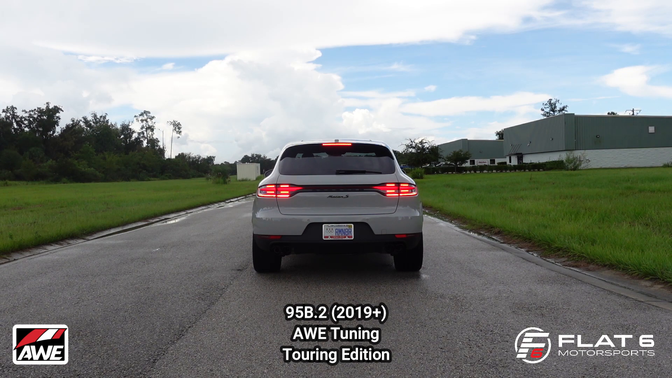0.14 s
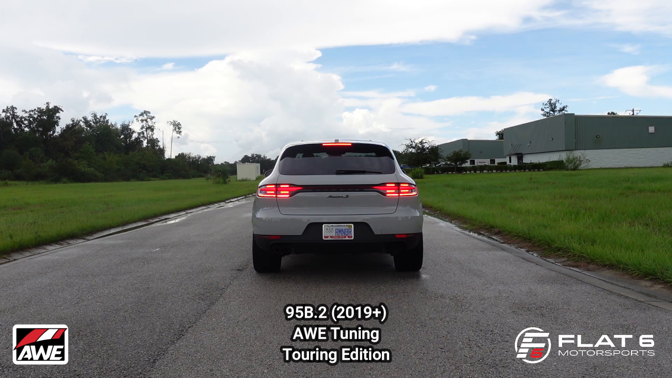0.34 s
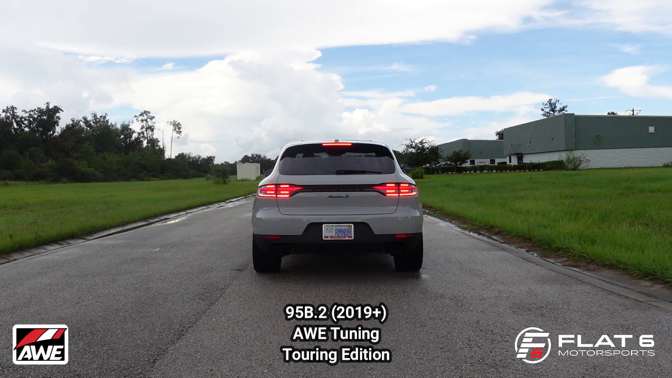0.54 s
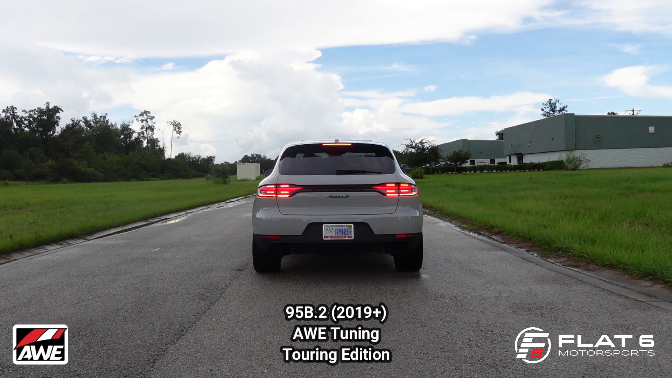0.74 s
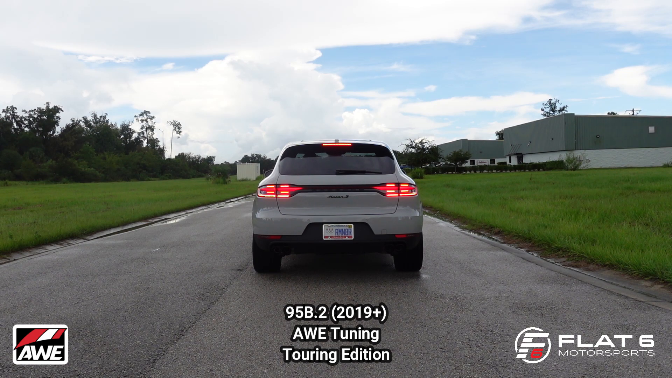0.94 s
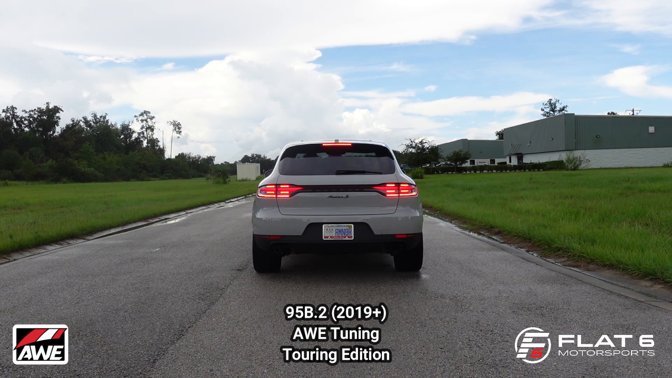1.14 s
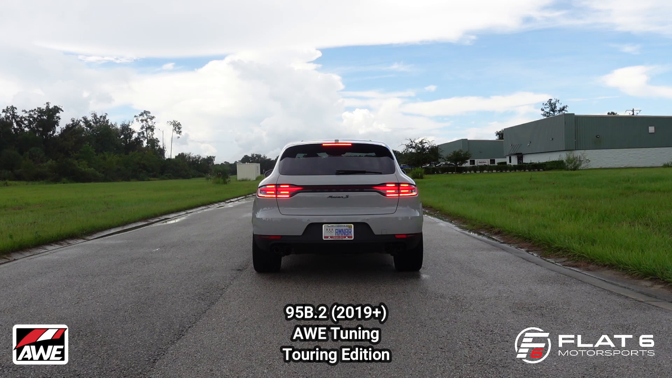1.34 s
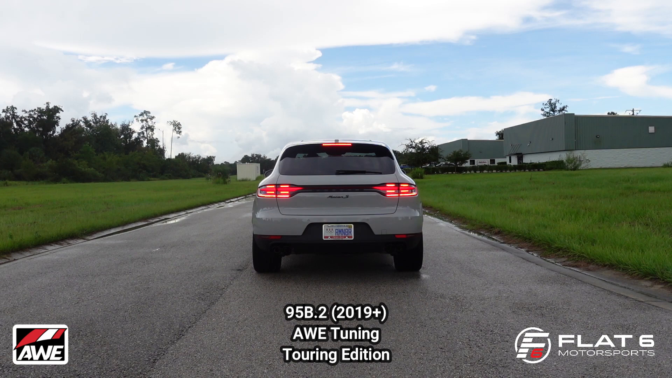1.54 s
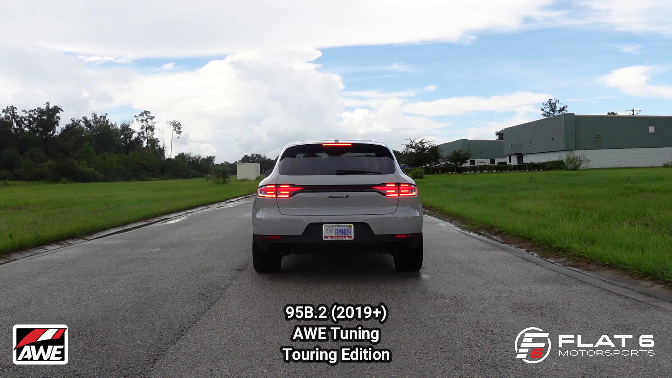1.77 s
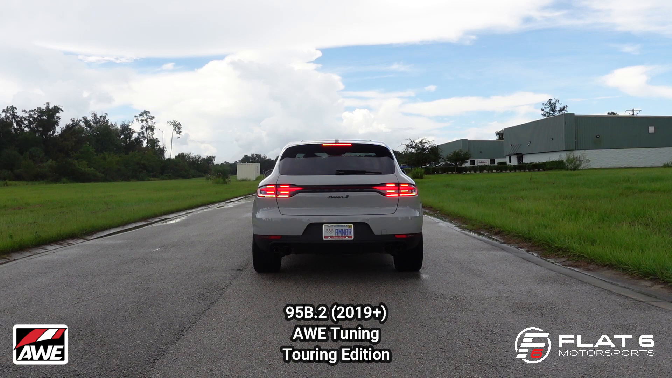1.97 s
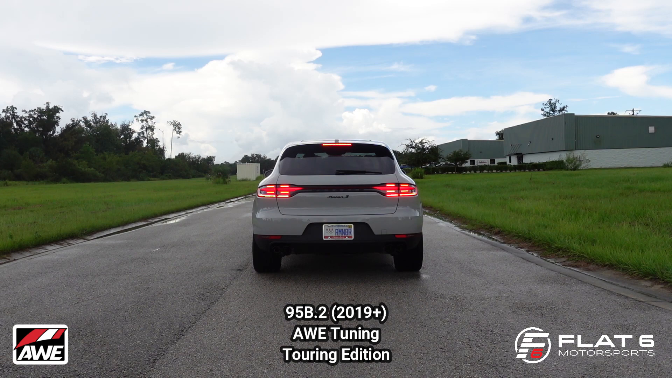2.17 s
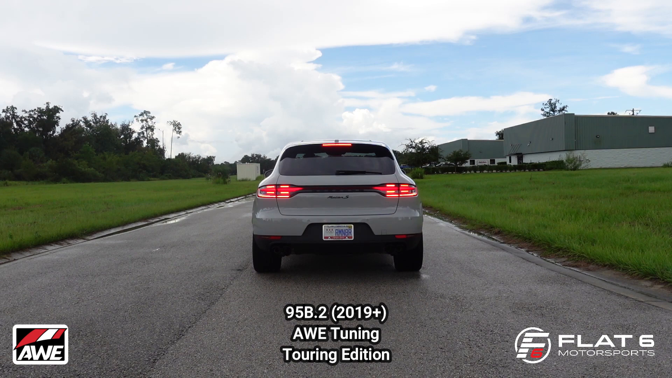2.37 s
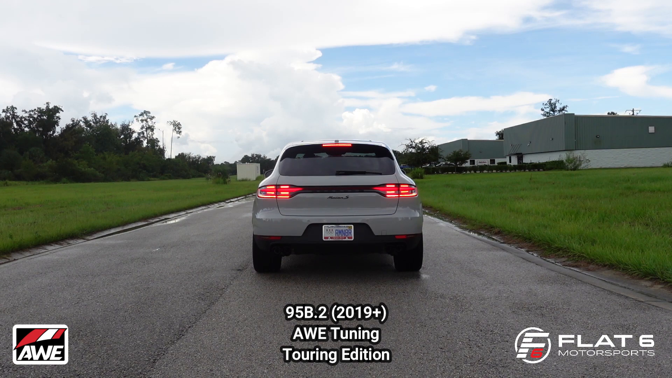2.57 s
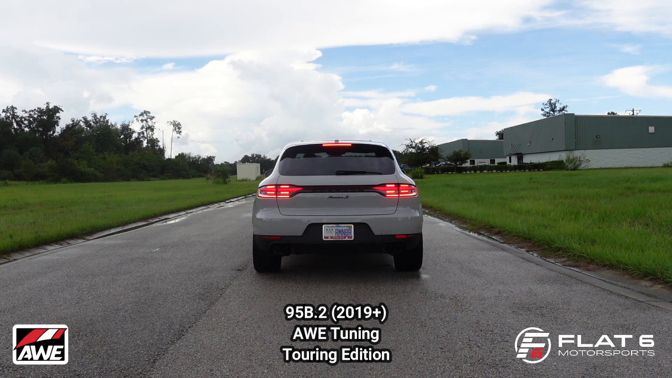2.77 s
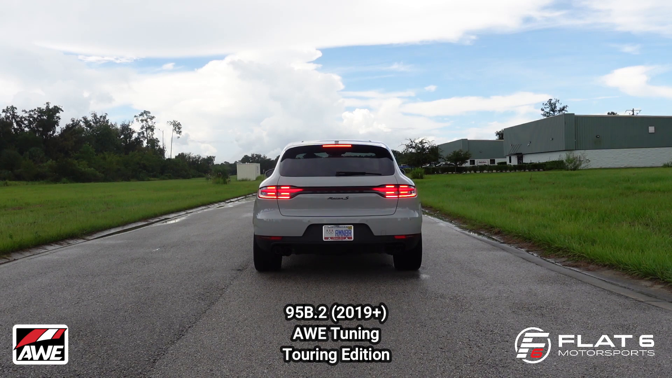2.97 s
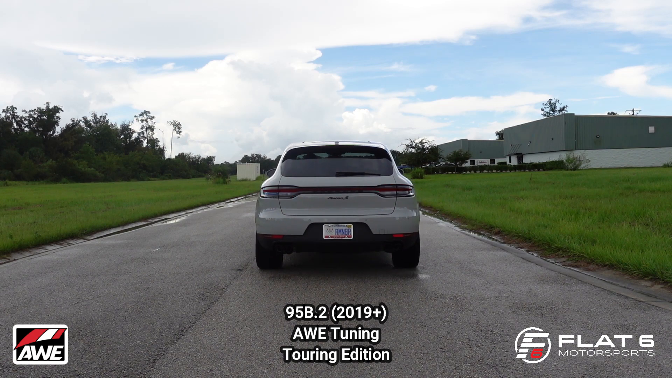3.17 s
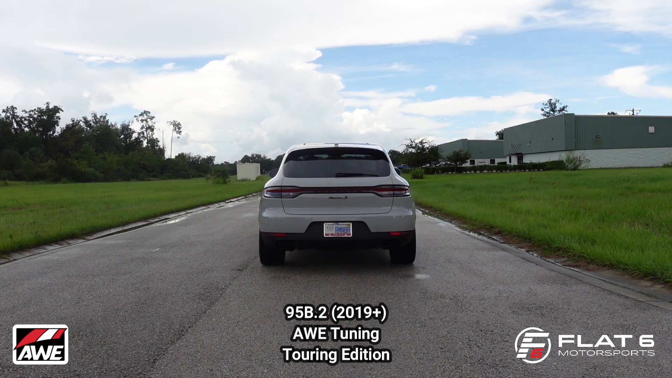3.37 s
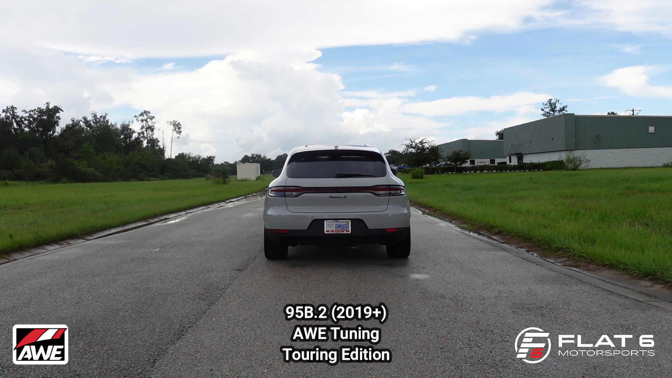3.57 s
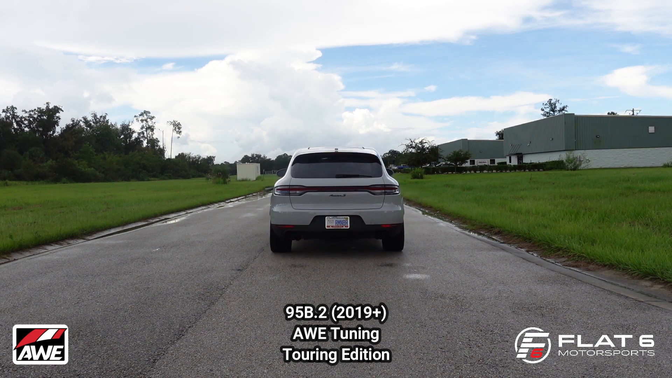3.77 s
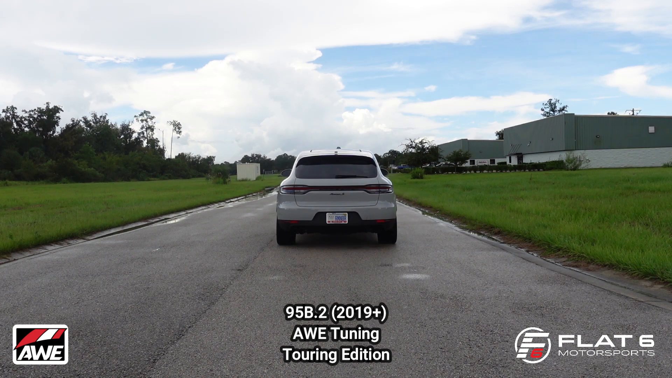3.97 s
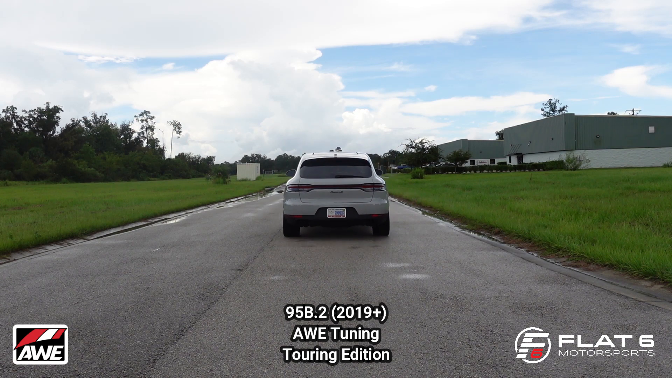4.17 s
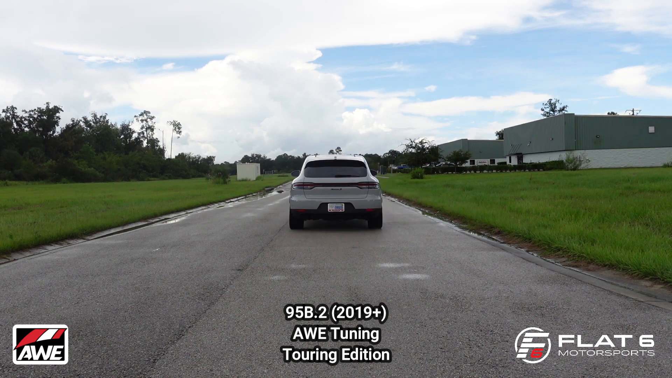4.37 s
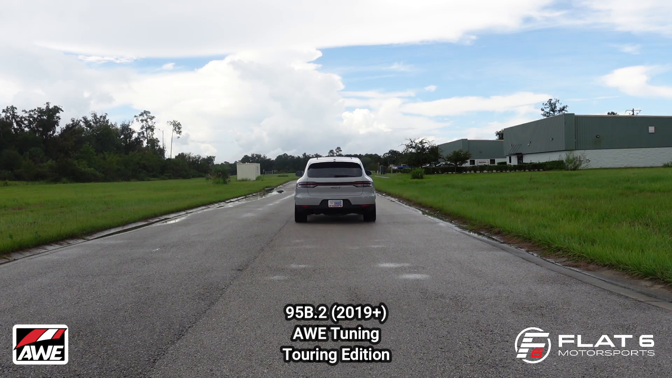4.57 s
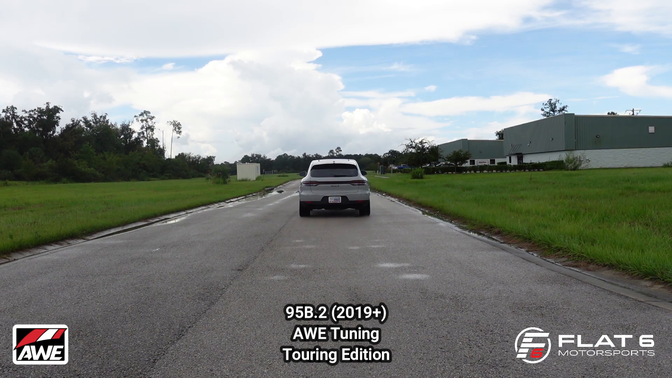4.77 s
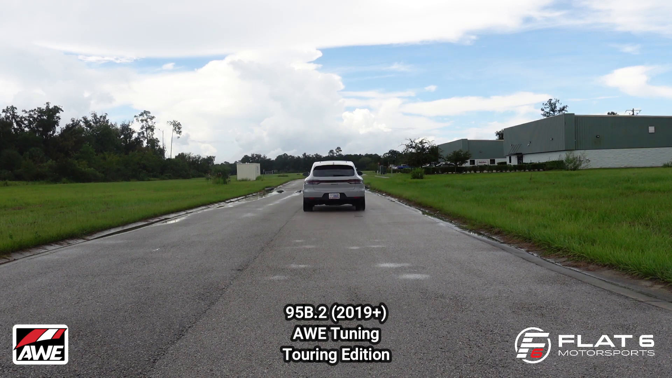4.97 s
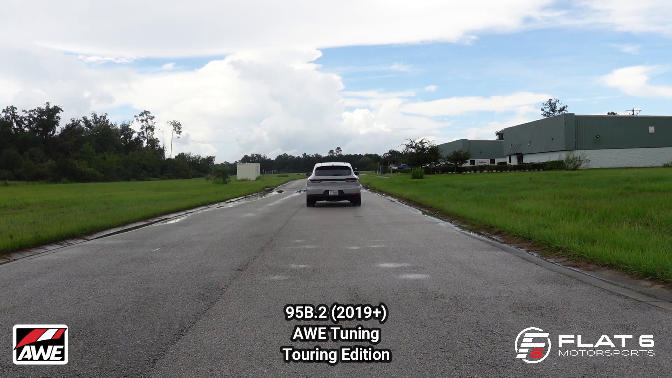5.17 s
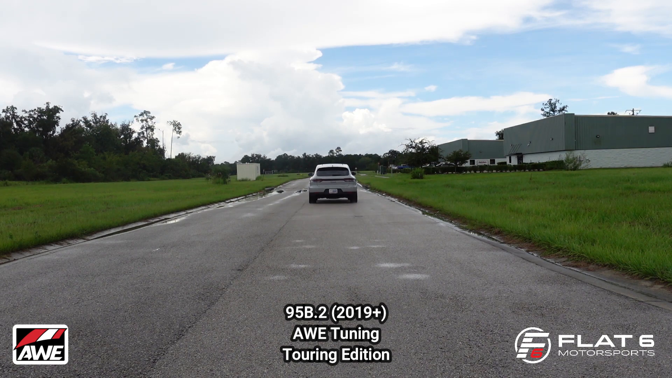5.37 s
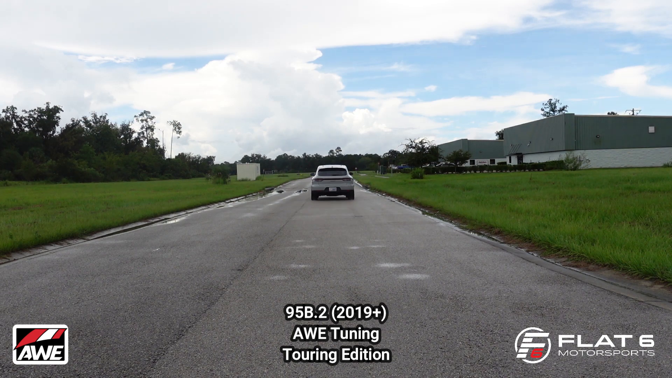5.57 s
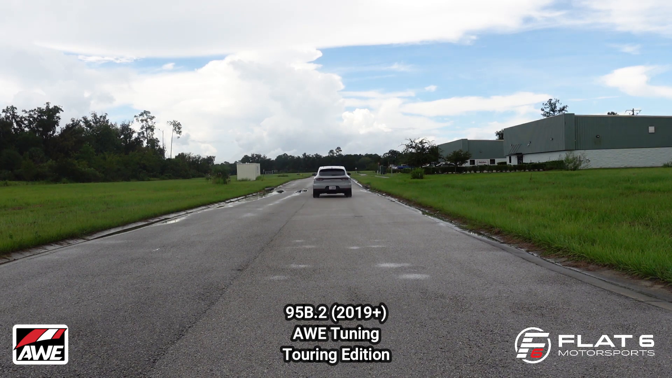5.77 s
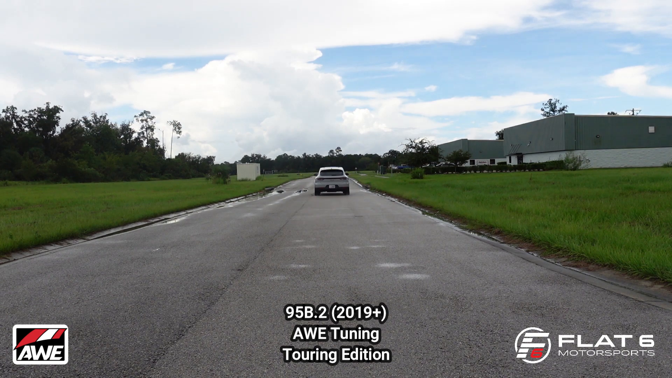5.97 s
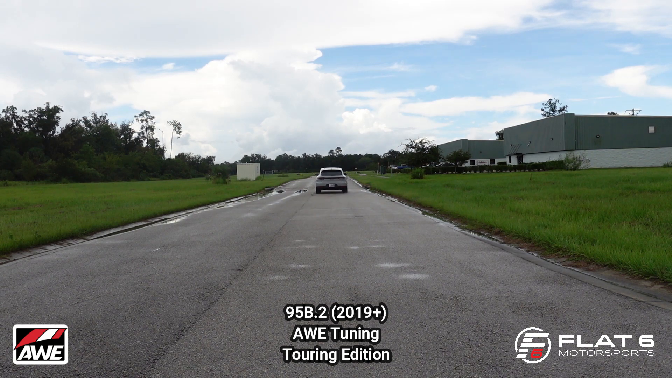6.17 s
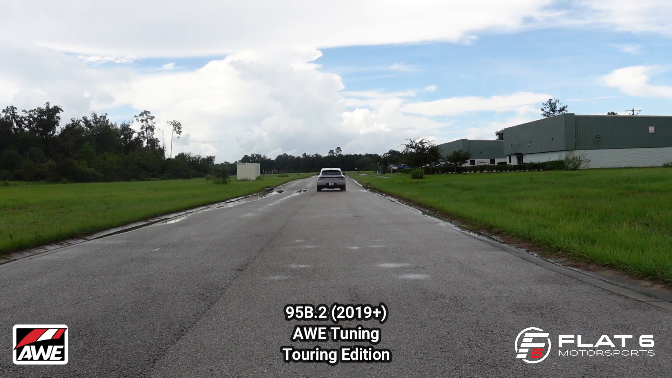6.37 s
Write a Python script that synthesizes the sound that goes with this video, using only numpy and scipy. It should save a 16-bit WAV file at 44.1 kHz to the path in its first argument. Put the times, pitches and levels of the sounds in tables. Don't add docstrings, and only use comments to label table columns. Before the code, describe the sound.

A turbocharged six-cylinder SUV idles with a raspy burble, then roars away down a wet road, pitch climbing, stuttering through one upshift.

```python
import sys
import numpy as np
from scipy import signal
from scipy.io import wavfile
from scipy.ndimage import uniform_filter1d

SR = 44100
rng = np.random.default_rng(int(sys.argv[2]) if len(sys.argv) > 2 else 0)


def log_audio(samples):
    frames = np.atleast_2d(samples).T
    limited = np.clip(frames, -1, 1)
    pcm = np.round(limited * 32767).astype(np.int16)
    wavfile.write(sys.argv[1], SR, pcm)


def boost_factor(decibels):
    exponent = np.asarray(decibels, float) / 20
    return 10 ** exponent


N = 283563
T = np.arange(N) / SR

# frequency in Hz, width in Hz, level in dB.
PIPE_MODES = [(72, 30, -4), (112, 30, -4), (155, 40, -4), (218, 30, -3), (255, 30, -5), (330, 28, 0),
              (425, 30, -7), (508, 28, -3), (598, 40, -15), (850, 300, -34)]
CYLINDER_OFFSETS = [.8, -.8, 1.3, -1.2, .3, -.5]
# time in seconds, share of the free idle 0-1, share of open throttle 0-1.
ENGINE_STATE = [
    (0, 1, 0),
    (.5, 1, 0),
    (.6, .6, 0),
    (1.05, .6, 0),
    (1.3, 0, 0),
    (2.2, 0, 0),
    (2.36, 0, 1),
    (6.43, 0, 1),
]
# time in seconds, half length in seconds, depth (1 is silence).
SPARK_CUTS = [(5.252, .004, 1), (5.275, .007, 1.1), (5.299, .005, 1.2), (5.324, .005, 1.2), (5.35, .003, 1),
              (5.376, .004, 1), (5.4, .005, 1), (5.428, .01, 1.1), (5.466, .005, 1)]
# time in seconds, effort in dB, sharpness of the blast in dB per octave, gas flow in dB.
ENGINE_DRIVE = [(0, -32.5, -8, -84), (.5, -29, 0, -62.5), (.6, -36, 2, -80), (1.2, -34, 0, -57.5),
                (2.25, -30.5, -12, -54.5), (2.42, -32.5, -3.5, -46), (2.6, -30.5, -2, -33),
                (2.85, -23, -2.5, -31.5), (3.2, -26.5, -3.5, -37.5), (3.5, -28, -1.5, -30),
                (3.9, -25.5, -1, -30), (4.3, -26, -0.2, -32), (4.65, -31, 6, -36), (4.95, -20, -0.5, -34.5),
                (5.2, -24.5, 2.5, -36), (5.5, -32, 3, -35), (6.1, -36.5, 7, -33), (6.43, -29.5, 5.5, -29)]


def evened(x):
    return x / np.sqrt(np.mean(x ** 2) + 1e-20)


def curves(rows):
    s, *columns = np.transpose(rows)
    return [np.interp(T, s, c) for c in columns]


def bumps(rows):
    out = np.zeros(N)
    for s, half, height in rows:
        near = slice(*np.searchsorted(T, [s - 4 * half, s + 4 * half]))
        out[near] += height * np.exp(-((T[near] - s) / half) ** 2)
    return out


def read(points, hz):
    f, value = np.transpose(points)
    return np.interp(np.log(hz + 1), np.log(f + 1), value)


def lowpass(x, order, hz):
    return signal.sosfilt(signal.butter(N=order, Wn=hz, fs=SR, output="sos"), x)


def resonate(x, hz, width):
    r = np.exp(-np.pi * width / SR)
    poles = [1, -2 * r * np.cos(2 * np.pi * hz / SR), r * r]
    once = signal.lfilter([1, 0, -1], poles, x)
    return evened(signal.lfilter([1], poles, once))


def ring(x, hz, width):
    turn = np.exp(2j * np.pi * np.cumsum(hz) / SR)
    r = np.exp(-np.pi * width / SR)
    return 2 * (turn * signal.lfilter([1 - r], [1, -r], x / turn)).real


def hiss(points, patchy_db, same):
    frames = N // 128 + 5
    hz = np.fft.rfftfreq(512, 1 / SR)
    a, b, c, d, patches = rng.standard_normal((frames, 257, 5)).T
    patches = uniform_filter1d(patches, 10, 0)
    patches = evened(uniform_filter1d(patches, 20, 1))
    mid = a + 1j * b
    side = np.sqrt(1 - same) * (c + 1j * d)
    colour = boost_factor(read(points, hz)[:, None] + patchy_db * patches)
    z = np.array([mid + side, mid - side]) * colour
    return evened(signal.istft(z, nperseg=512, noverlap=384)[1][:, :N])


def close():
    return np.clip((3.47 - T) / 0.04 + .5, 0, 1)


def firing():
    return np.clip(1 - bumps(SPARK_CUTS), 0, 1)


def layers():
    # time in seconds, half length in seconds, extra dB.
    stumbles = [
        (2.9, 0.16, -3.5),
        (3.3, 0.21, 6.5),
        (4.62, 0.054, 13),
        (4.95, 0.19, -3),
        (5.36, 0.15, 17.5),
        (6.1, 0.29, 6),
    ]
    # time in seconds, half length in seconds, jet dB, hiss dB.
    surges = [(2.49, 0.12, 1.5, 10.5), (3.066, 0.058, 2.5, 6.5), (3.25, 0.12, 3, 8.5),
              (3.462, 0.099, 4.5, 5.5), (3.72, 0.29, -5, -8), (4.35, 0.055, 2.5, 0),
              (4.462, 0.027, -15, -13.5), (4.655, .08, 1.5, 9.5), (4.882, .04, 3, 4),
              (5.066, .04, 5.5, 1.5), (5.35, 0.15, 6, 1), (5.767, 0.13, 1, 5)]
    effort_db, _, flow_db = curves(ENGINE_DRIVE)
    opened = curves(ENGINE_STATE)[1]
    idle_db, open_db = 2.5, 4.5
    burble_db = effort_db + idle_db + (open_db - idle_db) * opened + bumps(stumbles)

    free_db, loaded_db, load_s = -40.5, -32.5, 1.214
    snap_s, snap_db, snap_decay_s = 2.46, 12.5, 0.68
    away_s, away_db_per_s, away_db = 3.467, 42, 31
    loaded = np.clip((T - load_s) / 0.17 + .5, 0, 1)
    since = T - snap_s
    snap = snap_db * np.clip(since / 0.1 + .5, 0, 1) * np.exp(-np.maximum(since, 0) / snap_decay_s)
    away = np.clip((T - away_s) * away_db_per_s, 0, away_db)
    rasp_db = free_db + (loaded_db - free_db) * loaded + snap - away

    jet_db = flow_db + bumps([(s, half, db) for s, half, db, _ in surges])
    tyre_db = flow_db - 7.5 + bumps([(s, half, db) for s, half, _, db in surges])
    return burble_db, rasp_db, jet_db, tyre_db


def idle_orders(free):
    # multiple of the firing rate, level in dB.
    free_orders = [(1, -38), (2, -5), (3, 0), (4, -3), (5, -8), (6, 0), (7, -7), (8, -14), (9, -5),
                   (10, -21), (11, -24), (12, -30), (13, -25), (14, -19), (15, -33), (16, -27), (17, -35),
                   (18, -37), (19, -32), (20, -32), (21, -32), (22, -29)]
    # multiple of the firing rate, level in dB.
    loaded_orders = [(1, -32), (2, 0), (3, 0), (4, -11), (5, -13), (6, -7), (7, -9), (8, -13), (9, -3),
                     (10, -20), (11, -11), (12, -17), (13, -20), (14, -18), (15, -30), (16, -22), (17, -34),
                     (18, -32), (19, -35), (20, -29), (21, -25), (22, -27)]
    free_gain, loaded_gain = (boost_factor(np.array(table)[:, 1:]) for table in (free_orders, loaded_orders))
    return free * free_gain + (1 - free) * loaded_gain


def open_orders(order, hot_hz, sharp_db, step):
    # frequency in Hz, level in dB.
    exhaust_colour = [(45, -19), (80, 7), (200, 10.5), (350, 9.5), (560, 4.5), (630, -6.5), (900, -19),
                      (2800, -62.5)]
    # frequency in Hz, share 0-1.
    thrown_back = [(140, 0), (200, .4), (260, 0), (330, .6), (420, .9), (510, .6), (600, .88), (800, .7)]
    # [dB, from order 1 up].
    order_lean = [-0.5, 0, -1, -2.5, 1, .5]
    null_hz, spacing_hz = 421, 89
    short_share, short_null_hz, short_spacing_hz = .1, 486, 281
    long_return = np.clip(read(thrown_back, hot_hz), 0, .97) * np.exp(2j * np.pi * (hot_hz - null_hz) / spacing_hz)
    short_return = short_share * np.exp(2j * np.pi * (hot_hz - short_null_hz) / short_spacing_hz)

    blast_db = np.pad(order_lean, (0, len(order) - len(order_lean)))[:, None]
    blast_db = blast_db + sharp_db * np.log2(order)
    snarl_db = bumps([(4.72, 0.068, 9.9)])[::step]
    blast_db = blast_db + snarl_db * np.clip((hot_hz - 593) / 100, 0, 1)
    dip_hz, dip_width_hz, dip_db = 233, 52, -9
    blast_db = blast_db + dip_db * close()[::step] * np.exp(-((hot_hz - dip_hz) / dip_width_hz) ** 2)
    return boost_factor(blast_db + read(exhaust_colour, hot_hz)) * abs(1 - (long_return + short_return))


def tone(hz, turns, heat, effort_db, sharp_db):
    step = 64
    order = np.arange(1, 23)[:, None]
    cool_hz = order * (hz / heat)[::step]
    pipe = sum((-1) ** k * boost_factor(db) / (1 + 2j * (cool_hz - mode) / width)
               for k, (mode, width, db) in enumerate(PIPE_MODES))
    free, opened = (share[::step] for share in curves(ENGINE_STATE))
    full = open_orders(order, 1.116 * cool_hz, sharp_db[::step], step)
    blend = (1 - opened) * idle_orders(free) + opened * full
    shift_db = bumps([(5.37, .09, -2)])
    gain = boost_factor((effort_db + shift_db)[::step]) * blend * pipe / abs(pipe)
    even = np.zeros(N)
    for k, row in enumerate(gain, 1):
        smooth = np.interp(T, T[::step], row.real) + 1j * np.interp(T, T[::step], row.imag)
        even += (smooth * np.exp(2j * np.pi * k * turns)).real
    return np.sqrt(2) * even * firing()


def burble(turns, hz, heat, chance, level_db):
    count = turns.astype(int)
    off = np.take(CYLINDER_OFFSETS, count % 6) + 2.0 * chance[count]
    kicks = evened(np.diff(count, prepend=count[0]) * off / np.sqrt(hz))
    kicks = kicks + 1.1 * rng.standard_normal(N)
    soft = lowpass(kicks, 4, 690)
    rung = np.zeros(N)
    for k, (f, width, db) in enumerate(PIPE_MODES):
        weight = (-1) ** k * boost_factor(db - 22 * np.maximum(hz / f - 1, 0))
        rung += weight * ring(soft, f * heat, 0.51 * width)
    rumble_hz = 130
    low = signal.sosfiltfilt(signal.butter(N=2, Wn=rumble_hz, fs=SR, output="sos"), rung)
    rung = rung - np.clip(hz / rumble_hz - 1, 0, .8) * low
    return boost_factor(level_db - 6.5) * evened(rung) * firing()


def rasp(turns, hz, chance, level_db):
    # frequency in Hz, width in Hz, level in dB.
    tip_modes = [(2390, 230, 1), (2614, 326, 4.5), (2832, 890, 3.5), (1823, 370, -5.5), (3510, 660, -13.5),
                 (5060, 1000, -18)]
    count = np.round(turns).astype(int)
    since = (turns - count) / hz + .0008
    short = np.minimum(np.sqrt(50 / hz), 1)
    decay_s = np.where(since < 0, .0016, .0034)
    burst = np.exp(-(since / short / decay_s) ** 2) + .05
    pattern = np.take(CYLINDER_OFFSETS, count % 6)
    drive = burst * np.sqrt(hz)
    tips = drive * boost_factor(short ** 2 * (1.3 * chance[count] + pattern))

    ringing, detune, start = rng.standard_normal((count[-1] + 1, len(tip_modes), 3)).T[..., count]
    ringing = boost_factor(2.5 * ringing)
    lift = 1 + bumps([(3.0, .3, .08)])
    fizz, clean = np.zeros(N), np.zeros(N)
    for g, d, p, (f, width, db) in zip(ringing, detune, start, tip_modes):
        fizz += boost_factor(db) * resonate(tips * g * rng.standard_normal(N), f, width)
        mode_hz = f * lift + 0.22 * width * d
        clean += boost_factor(db) * g * np.cos(2 * np.pi * (mode_hz * since + p))
    clean = clean * (tips - tips * .05 / burst)
    ring_share = .6
    shaken = np.sqrt(1 - ring_share) * evened(fizz) + np.sqrt(ring_share) * evened(clean)
    shaken = signal.lfilter(*signal.iirnotch(3950, 3.5, SR), shaken)
    return boost_factor(level_db + 2.5) * shaken + heat_shield(burst, level_db)


def gas_flow(turns, jet_db, tyre_db):
    # frequency in Hz, level in dB per Hz.
    jet_colour = [(120, -41.5), (350, -4), (600, 7.5), (665, -19.5), (720, -2), (1150, -3.5), (1840, -10),
                  (2540, -12.5), (4000, -43), (5200, -58), (8800, -120)]
    # frequency in Hz, level in dB per Hz.
    tyre_colour = [(1180, -37.5), (2000, -3), (2330, -14.5), (2970, -6), (3540, -7.5), (4400, -7.5),
                   (5210, -13.5), (9850, -28), (10700, -30.5), (13100, -40), (14900, -57.5)]
    near_depth, far_depth = .58, .38
    depth = far_depth + (near_depth - far_depth) * close()
    puff = evened(1 + depth * np.cos(2 * np.pi * turns))
    flow = boost_factor(jet_db + 6) * hiss(jet_colour, 2.28, 1.0) + boost_factor(tyre_db) * hiss(tyre_colour, 2.0, 1.0)
    return puff * flow


def insects():
    # time in seconds, level in dB.
    buzz_level = [
        (0, -55),
        (1, -52.5),
        (2.4, -52.5),
        (2.8, -54),
        (3.5, -64),
        (4.5, -70),
        (5.5, -67),
        (6.43, -55),
    ]
    beat = evened(.45 + (.5 + .5 * np.cos(2 * np.pi * 67.6 * T)) ** 2)
    near, left, right = rng.standard_normal((3, N))
    buzz = []
    for far in (left, right):
        main = resonate(resonate(near + 1.4 * far, 9900, 620), 9950, 900)
        buzz.append(main + .14 * resonate(far, 9200, 900))
    buzz = evened(lowpass(buzz, 6, 11000))
    lean = boost_factor(np.array([[1.2], [-1.2]]))
    return boost_factor(curves(buzz_level)[0]) * beat * buzz * lean


def open_field():
    # frequency in Hz, level in dB per Hz.
    field_colour = [(320, -32), (550, 7.5), (626, -19), (781, 2.5), (976, -1), (1280, -10), (1810, -10),
                    (2110, -10.5), (2550, -11), (3920, -29), (5260, -22.5), (8010, -32), (9000, -20),
                    (11400, -43), (12400, -62), (13900, -51), (15000, -66.5)]
    return boost_factor(-44) * hiss(field_colour, 2.0, 0.91)


def heat_shield(burst, level_db):
    # time in seconds, peak level in dB.
    shield_hits = [(2.506, -15), (2.586, -14.5), (2.717, -17.5), (2.883, -10.5), (2.967, -19),
                   (3.038, -13.5), (3.124, -14), (3.21, -14), (3.274, -14), (3.378, -14), (3.478, -14)]
    knock = resonate(evened(burst + 0.11) * rng.standard_normal(N), 995, 250)
    rattle = bumps([(s + 0.01, .018, boost_factor(db - 10)) for s, db in shield_hits])
    return (rattle + boost_factor(level_db - 13.5)) * knock


def low_throbs(turns):
    # order, time in seconds, half length in seconds, level in dB.
    throbs = [
        (1 / 2, 4.385, 0.055, -37),
        (1 / 3, 5.35, 0.1, -35),
        (1 / 3, 3.52, .12, -48),
    ]
    return sum(bumps([(s, half, boost_factor(db))]) * np.cos(2 * np.pi * k * turns) for k, s, half, db in throbs)


def turbo():
    # time in seconds, half length in seconds, frequency in Hz, width in Hz, level in dB.
    gusts = [
        (4.322, 0.19, 2930, 1490, -33),
        (4.905, 0.057, 3700, 905, -39.5),
        (5.668, 0.039, 3440, 900, -37),
        (6.303, 0.23, 7400, 2500, -48),
    ]
    crackle = rng.random(N) < 250 / SR
    air = rng.standard_normal(N) * (1 + 10.0 * crackle)
    return sum(bumps([(s, half, boost_factor(db))]) * resonate(air, f, width) for s, half, f, width, db in gusts)


def car():
    # time in seconds, firings a second in Hz.
    firing_rate = [(0.0, 36.04), (0.742, 36.89), (1.169, 35.44), (1.41, 36.35), (2.195, 37.42),
                   (2.462, 44.91), (2.766, 66.54), (3.126, 78.69), (3.417, 107.35), (3.546, 116.61),
                   (4.262, 148.54), (4.47, 187.95), (4.641, 213.59), (4.975, 257.17), (5.217, 269.81),
                   (5.477, 178.92), (5.655, 191.0), (6.43, 231.55)]
    # time in seconds, factor.
    gas_heat = [(0, .99), (2.3, .99), (2.5, 1.03), (3, 1.1), (3.6, 1.116), (6.43, 1.116)]
    # delay in seconds, level in dB.
    road_echoes = [(.0031, -51), (.0085, -15.5), (0.011, -19), (0.024, -29)]
    (hz,), (heat,) = curves(firing_rate), curves(gas_heat)
    burble_db, rasp_db, jet_db, tyre_db = layers()
    turns = np.cumsum(hz) / SR + .86
    thump = turns - 0.003096 * hz
    chance = rng.standard_normal((int(turns[-1]) + 3, 2))

    flutter = boost_factor(uniform_filter1d(chance[thump.astype(int), 0], size=120))
    effort_db, sharp_db, _ = curves(ENGINE_DRIVE)
    even = tone(hz, thump, heat, effort_db, sharp_db) + np.sqrt(2) * low_throbs(thump)
    even = flutter * even
    wide = 0.016 * np.array([[1], [-1]]) * (np.roll(even, 150) - even)

    rough = burble(thump, hz, heat, chance[:, 0], burble_db) + rasp(turns, hz, chance[:, 1], rasp_db)
    echoes = np.array([sum(boost_factor(db) * np.roll(rough, round(s * SR * late)) for s, db in road_echoes)
                       for late in (1, 1.002)])
    return even + wide + turbo() + rough + echoes + gas_flow(turns, jet_db, tyre_db)


def scene():
    # time in seconds, left minus right in dB.
    drift = [(0, 0), (2.4, 0), (3, -1), (3.6, -.6), (5, -.4), (6.43, -.3)]
    pan = boost_factor(np.array([[.5], [-.5]]) * curves(drift)[0])
    return car() * pan + insects() + open_field()


def top_cut(x):
    return signal.sosfilt(signal.butter(12, 15010, fs=SR, output="sos"), x)


def record(dry):
    bass_cut = signal.butter(N=4, Wn=47, btype="high", fs=SR, output="sos")
    cut = signal.sosfilt(bass_cut, dry)
    mix = 1.244 * np.tanh(cut / 1.35)
    return top_cut(mix)


dry = scene()
out = record(dry)
log_audio(out)
```